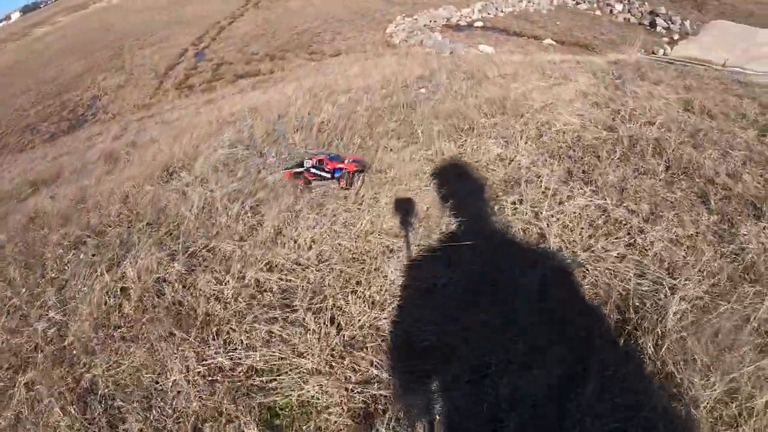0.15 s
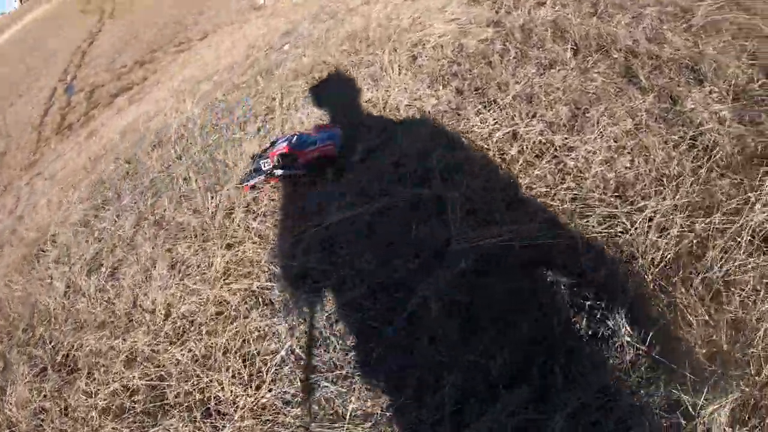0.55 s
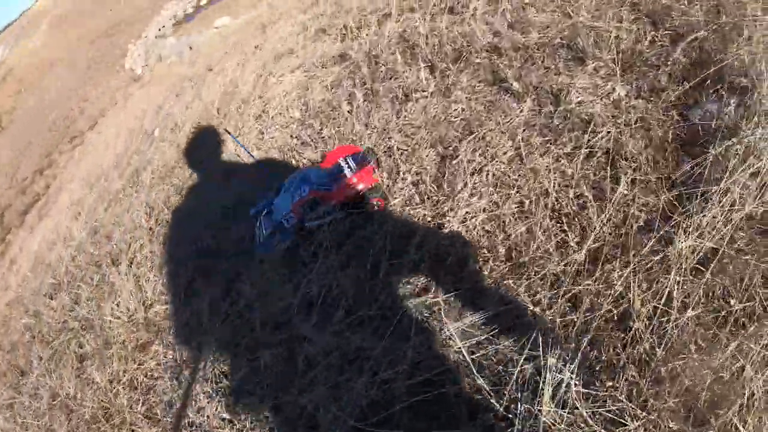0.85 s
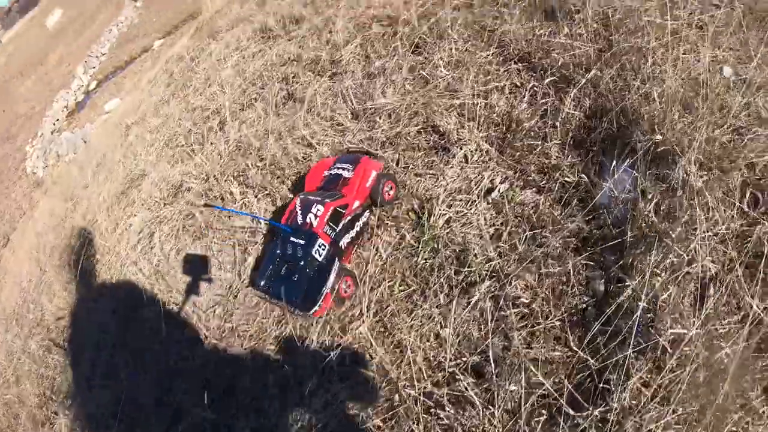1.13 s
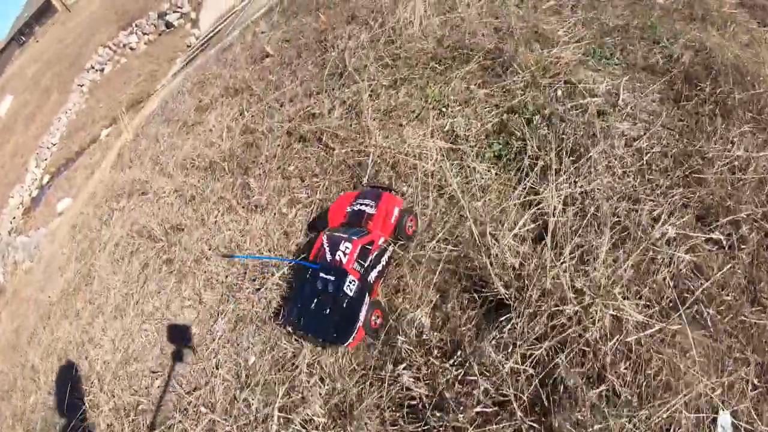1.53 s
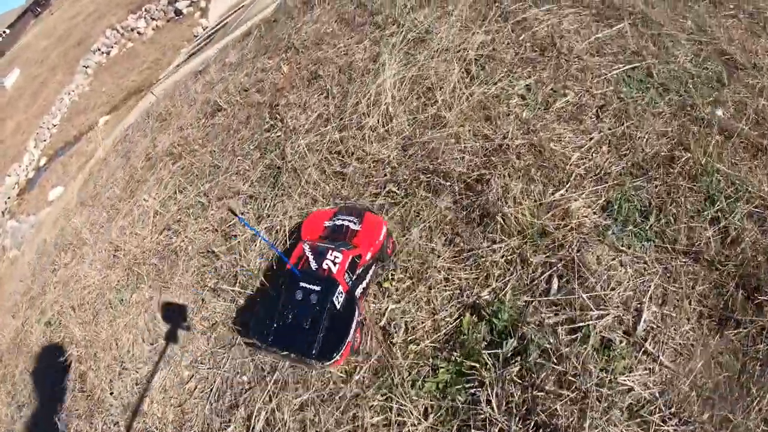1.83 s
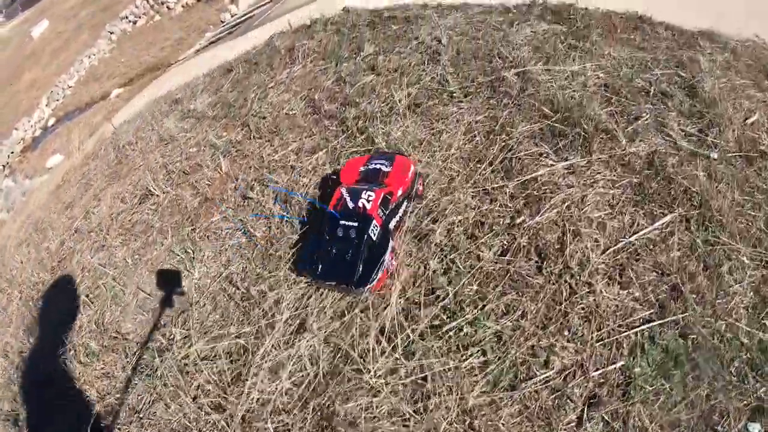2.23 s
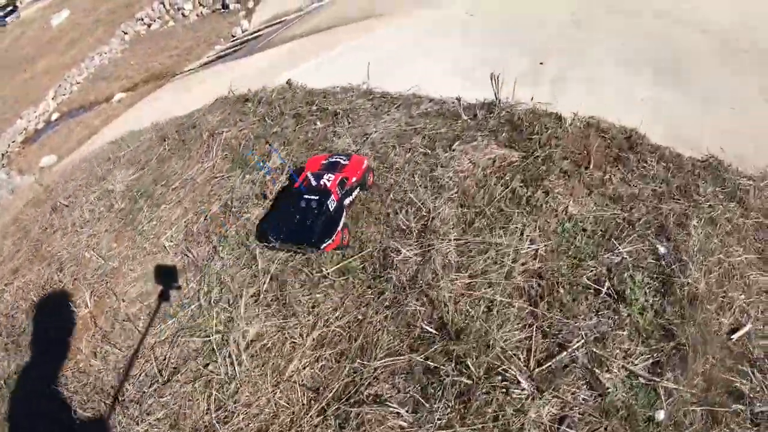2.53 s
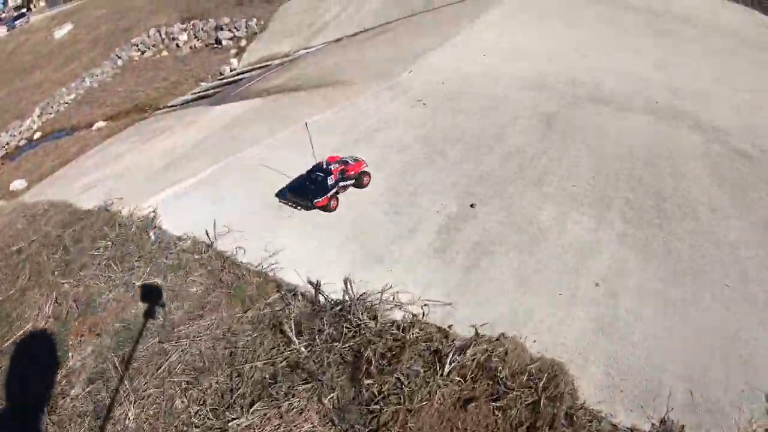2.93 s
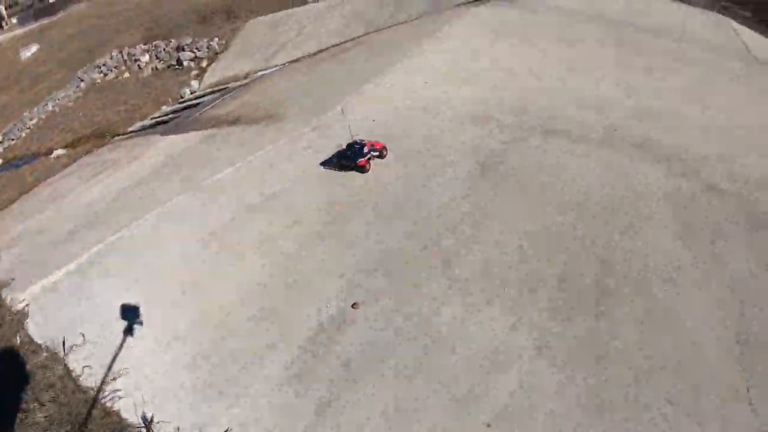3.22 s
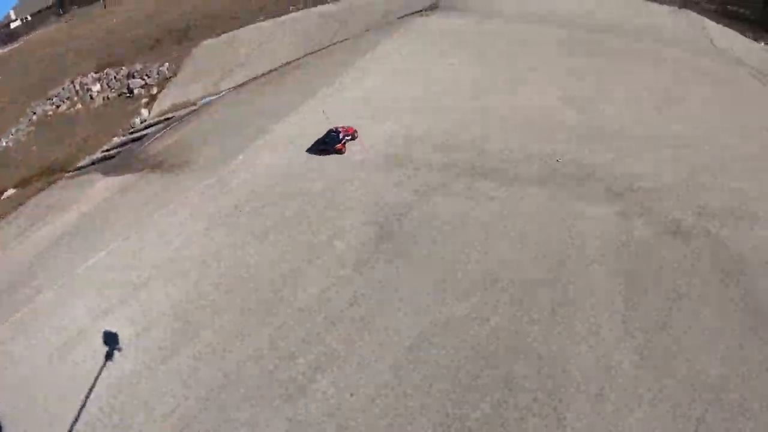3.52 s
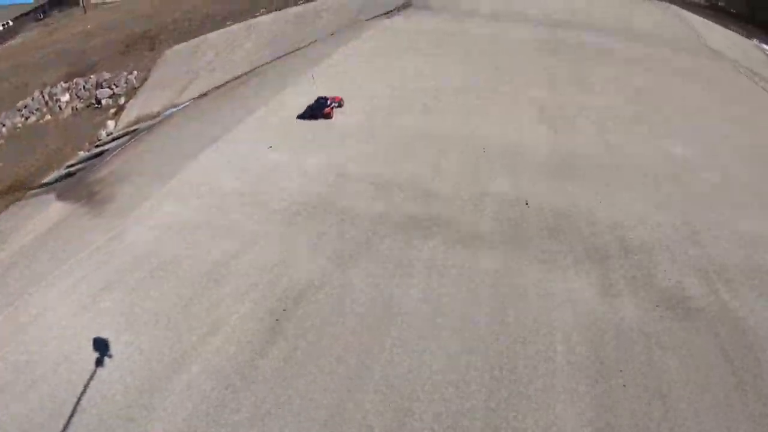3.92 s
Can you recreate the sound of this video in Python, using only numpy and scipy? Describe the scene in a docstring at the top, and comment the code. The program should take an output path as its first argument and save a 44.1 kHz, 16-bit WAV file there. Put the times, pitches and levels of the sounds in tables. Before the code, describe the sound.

A small electric model truck rustles and knocks through dry grass past the microphone, then whines away higher over bare concrete.

```python
"""Electric model truck, dry grass to concrete

A small truck ploughs towards the microphone through tall dry grass, passes close by, then runs off over concrete.
Stalks and tyre grit are random grains given a spectrum; motor and gears are unsteady tones tied to one speed curve.
Bumps are struck shell and chassis modes; wind buffets the microphone and one gust thumps its left port.
Most levels follow curves in time; bumps and thumps are single events, and the faint air wash is steady.
The stereo image closes towards the centre."""
import sys
import numpy as np
from scipy import signal
from scipy.fft import rfft, irfft, next_fast_len
from scipy.io import wavfile

SR = 44100
rng = np.random.default_rng(int(sys.argv[2]) if len(sys.argv) > 2 else 0)


def unload_audio(sound):
    """Save the sound as a 16-bit wav file, at the path given as the first command line argument."""
    columns = np.transpose(np.atleast_2d(sound))
    # keep every value between -1 and 1, then stretch to whole-number steps
    steps = np.round(np.clip(columns, -1, 1) * 32767)
    wavfile.write(sys.argv[1], SR, steps.astype(np.int16))


N = 179338
TIME = np.arange(N) / SR   # s

# Speed of the motor. Each row: time in seconds, whine in Hz.
MOTOR_SPEED = [(0, 799), (.06, 761), (.13, 856), (.27, 660), (.32, 705), (.39, 805), (.46, 822), (.52, 869),
               (.57, 1104), (.63, 1118), (.68, 1175), (.73, 1226), (.88, 1098), (1.01, 1178), (1.07, 1027),
               (1.15, 754), (1.21, 725), (1.28, 961), (1.34, 943), (1.43, 717), (1.47, 705.6), (1.58, 620),
               (1.66, 703), (1.73, 703.6), (1.79, 828), (1.85, 840), (1.97, 599.6), (2.13, 635), (2.2, 798),
               (2.27, 856), (2.42, 752), (2.52, 793), (2.6, 993), (2.77, 1202), (2.9, 1169), (3.02, 1310),
               (3.09, 1756), (3.2, 1718), (3.33, 1654), (3.58, 1600), (3.71, 1784), (3.77, 1650),
               (3.79, 1438), (3.86, 1249), (3.94, 1210), (4.01, 1050), (4.07, 1017)]
# Passage through the grass. Each row: time in seconds, swish in dB and shell drumming in dB, both before trims.
GRASS_LEVELS = [(0, -34.5, -52), (.05, -32.5, -41), (.2, -38.5, -48.5), (.33, -34, -43), (.55, -30.5, -47),
                (.7, -28, -38.5), (.87, -28.5, -36), (1.0, -28, -40), (1.19, -29, -33), (1.29, -25, -35),
                (1.42, -28.5, -31.5), (1.59, -23.5, -31), (1.67, -28, -31.5), (2.08, -26, -32.5),
                (2.16, -29.5, -31.5), (2.3, -24.5, -30.5), (2.42, -28.5, -32.5), (2.6, -24, -31),
                (2.76, -25, -38), (3.05, -26, -34)]
# The throttle is eased or blipped. Each row: time in seconds, half length in seconds,
# then the change of the pinion, of the idler, of the spur gear and of the motor, all in dB.
THROTTLE_MOVES = [(.04, 0.027, 3, 3, -2, 2), (.22, 0.05, -14, -7, 5.5, -1), (.345, 0.021, 4.5, -1, 4, 4),
                  (.46, 0.032, 1.5, -3, -8, -1), (.53, .02, 0, 2, -9, -15), (.68, 0.044, 6, 7, 2, 4),
                  (.86, .05, -2, 4, -8, -17), (.955, 0.012, 21.5, -2, -10, -25),
                  (1.03, 0.032, 12.5, 10, 6.5, 0), (1.08, .012, -6, -4, -6, 7),
                  (1.215, 0.012, 6, 0, -11, 10), (1.295, 0.053, 7, 3.5, 9.5, -0.5),
                  (1.44, 0.021, 8.5, -8, -4, -7), (1.8, .025, 9.5, 8, 0, -8), (1.87, .012, 10, 0, 3, 0),
                  (1.93, .03, -3, 0, -8, -3), (2.14, 0.014, -18, 1, 0, -4), (2.28, .05, -1, 5, 3, 2),
                  (2.47, 0.063, -3.5, 0, -5, -16), (2.6, 0.042, 0, 7, 9.5, 3), (2.72, 0.05, -9, 3, 15, -3),
                  (2.81, .025, 5, 5, -1, 3), (2.95, 0.062, 10, 1, -4, 3.5), (3.33, .08, 2, 0, -2, 5.5),
                  (3.52, 0.013, 9.5, 0, 0, 6), (3.63, 0.034, 2, 0, 6, -12), (3.735, 0.027, 8, 0, 6, 7),
                  (3.84, 0.058, 12.5, 0, -2, 8.5), (3.965, .03, 7, 11, 0, -8)]
# The gear tones start rough, are cleanest near .7 s, then roughen through the grass and onto the concrete.
# Each row: time in seconds, roughness from 0 to 1.
BACKLASH_ROUGHNESS = [(0, .65), (.45, .35), (.72, .14), (1.05, .3), (1.25, .55), (1.9, .6), (2.4, .8),
                      (2.7, .6), (2.85, .8), (3.1, .8), (4.07, .55)]

GRASS_ENDS_S = 3.06
FULL_POWER_HZ = 1200   # whine at which the motor reaches its full power


def from_db(db):
    """Decibels to gain."""
    return 10 ** (np.asarray(db) / 20)


def rms_one(x):
    """Scale to unit rms."""
    return x / np.sqrt(np.mean(x ** 2) + 1e-20)


def in_time(rows):
    """Each column of a curve, sample by sample."""
    s, *columns = np.transpose(rows)
    return [np.interp(TIME, s, column) for column in columns]


def swells(rows, half_s=None):
    """Bell-shaped changes of level, summed for each column; their half length is shared or follows the time."""
    s, *columns = np.transpose(rows)
    if half_s is None:
        half_s, columns = columns[0][:, None], columns[1:]
    bells = np.exp(-.5 * ((TIME - s[:, None]) / half_s) ** 2)
    return np.array(columns) @ bells


def drift(rate):
    """Smooth random wandering, mostly slower than this rate in Hz; spread about 1."""
    step = 20   # samples between the drawn points
    pole = np.exp(-2 * np.pi * rate * step / SR)
    noise = rng.standard_normal(N // step + 2002)
    slow = signal.lfilter([1], [1, -2 * pole, pole * pole], noise)[2000:]   # let it settle first
    return np.interp(np.arange(N) / step, np.arange(len(slow)), rms_one(slow))


def colour(x, spectrum):
    """Filter a signal by a spectrum that falls away beyond its ends; rms 1."""
    size = next_fast_len(N)
    hz = np.maximum(np.fft.rfftfreq(size, 1 / SR), 1)
    points, db = np.transpose(spectrum)
    ends = np.minimum(hz / points[0], 1) ** 2 * np.minimum(points[-1] / hz, 1) ** 2
    gain = ends * from_db(np.interp(np.log(hz), np.log(points), db))
    return rms_one(irfft(rfft(x, size) * gain, size)[..., :N])


def ring(clicks, hz, t60):
    """A unit click sets a sine of height 1 ringing; it falls by 60 dB in t60 seconds."""
    r, w = from_db(-60 / (t60 * SR)), 2 * np.pi * hz / SR
    return signal.lfilter([0, np.sin(w)], [1, -2 * r * np.cos(w), r * r], clicks + 1e-18)


def grains(per_s, spread_db):
    """Tiny contacts at random moments, of random sign and spread in strength; rms 1."""
    strength_db = spread_db * np.minimum(rng.exponential(1, N), 4)
    sizes = from_db(strength_db) * rng.choice([-1, 1], N)
    return rms_one(sizes * (rng.random(N) < per_s / SR))


def widen(mid, side_db):
    """Sound scattered around the source differs between the channels: noise is added to one, taken from the other."""
    return mid + from_db(side_db) * rng.standard_normal(N) * np.array([[1], [-1]])


def distance_db():
    """Sound weakens in proportion to distance; 0 dB at 1 m."""
    # The truck comes up to the microphone, then runs off. Each row: time in seconds, distance in metres.
    path = [(0, 2.9), (.65, 0.87), (1.2, 1.03), (2.5, 1.6), (3.1, 1.36), (3.5, 2.17), (3.85, 3.23),
            (4.07, 5.3)]
    return -20 * np.log10(in_time(path)[0])


def on_concrete(crossing_s=0.0047):
    """Share of the truck's weight that has left the grass."""
    return .5 + .5 * np.tanh((TIME - GRASS_ENDS_S) / crossing_s)


def hops_db():
    """The level dips while the wheels are off the ground."""
    # The truck hops clear of the ground. Each row: time in seconds, change of level in dB.
    hop_rows = [(.09, -6.5), (.798, -5.5), (.84, -9), (1.127, -7), (1.174, -12), (1.38, -0.5),
                (1.411, -3.5), (1.49, -2), (1.65, -3.5), (1.692, -5.5), (1.707, -5.5), (1.843, -7),
                (1.9, -2), (2.13, -4.5), (2.17, -2.5), (2.38, -6), (3.09, -4), (3.68, -5)]
    return swells(hop_rows, half_s=0.0038)[0]


def patchy(x, depth_db, rate, count):
    """Each stalk has its own pitch: neighbouring bands swell and fade on their own; rms 1."""
    size = next_fast_len(N)
    spectrum, hz = rfft(x, size), np.fft.rfftfreq(size, 1 / SR)
    centres = np.geomspace(900, 6500, count)
    total = 0
    for tent in np.eye(count):   # overlapping triangular bands
        band = irfft(spectrum * np.interp(hz, centres, tent), size)[..., :N]
        total = total + band * from_db(depth_db * drift(rate))
    return rms_one(total)


def stalks(per_s, t60, soft_hz=4800, count=24):
    """Single stiff stalks flick free and ring briefly, each at its own pitch; rms 1."""
    pitches = np.geomspace(2350, 4500, count) * (1 + .015 * rng.standard_normal(count))
    rings = sum(ring(grains(per_s / count, spread_db=-2.5), hz, t60) for hz in pitches)
    return rms_one(signal.sosfilt(signal.butter(6, soft_hz, fs=SR, output="sos"), rings))


def grass():
    """Stalks brush the shell in clumps, flick, drum on it, sizzle and snap."""
    # Tufts slap the shell. Each row: time in seconds, swish gain in dB, crackle and rasp gain in dB.
    tufts = [(.82, -1, 0), (.92, 1.5, -7), (.955, -4, 0), (1.158, 10.5, -7), (1.585, 4, 5.5),
             (1.635, 7, 12.5), (1.729, 10, -5), (2.1, 5.5, -2), (2.114, 5.5, -4), (2.779, -11.5, 4),
             (2.955, 2, 12.5), (3.008, 6, -2)]
    # Treble against swish, high while the truck comes head on. Each row: time in seconds, level in dB before trims.
    brightness = [(0, -4.5), (.72, 1), (1.05, -11.5), (1.3, -14), (1.5, -19), (2.3, -26.5), (3.05, -15.5)]
    # Shapes of the four grass sounds. Each row: frequency in Hz, relative density in dB per Hz.
    swish_shape = [(500, -16), (900, -3.5), (1150, -0.5), (1400, -3.5), (1750, -2), (2050, -4), (2500, 0),
                   (3300, 0), (3950, -3.5), (4400, -4), (4900, -4), (5200, -9.5), (5600, -32), (7500, -30)]
    drum_shape = [(90, -12.5), (170, -1), (260, -1.5), (330, -8), (430, -3.5), (570, 2), (760, -2.5),
                  (950, -12.5), (1400, -24), (2500, -17.5)]
    crackle_shape = [(6300, -4), (7100, -5), (7600, -0.5), (8500, 2.5), (9200, -3), (9900, 2.5),
                     (11000, -4.5), (13000, -8.5), (15500, -24)]
    rasp_shape = [(4500, -0.5), (5150, 6.5), (5600, 0), (6600, 0.5), (6950, -2.5), (7400, -8), (8700, -17),
                  (9850, -9.5), (11000, -50)]

    (swish_db, drum_db), (bright_db,) = in_time(GRASS_LEVELS), in_time(brightness)
    tuft_db, snap_db = swells(tufts, half_s=0.0038)
    clumps_db = 1.4 * drift(45) + hops_db()

    brushing = colour(widen(grains(per_s=4500, spread_db=1.5), side_db=-48), swish_shape)
    brushing = patchy(brushing, depth_db=3.0, rate=13.8, count=22)
    flicks = from_db(-4.5) * stalks(per_s=260, t60=.03)
    swish = (brushing + flicks) * from_db(swish_db - 2 + tuft_db + 0.21 * drift(43))

    drum = colour(widen(grains(per_s=1100, spread_db=1.5), side_db=-36), drum_shape)
    drum = drum * from_db(drum_db - 1 + 1.0 * drift(18))

    crackle = colour(widen(grains(per_s=9000, spread_db=2.0), side_db=-4), crackle_shape)
    crackle = crackle * from_db(swish_db - 13 + 0.42 * bright_db + snap_db)   # follows brightness in part

    rasp = colour(widen(grains(per_s=12000, spread_db=5.0), side_db=-14.0), rasp_shape)
    rasp = rasp * from_db(swish_db + 2 + bright_db + snap_db + 1.6 * drift(76))
    return (swish + drum + crackle + rasp) * from_db(clumps_db)


def shaft_phase():
    """The turning of the motor in radians: dragging stalks shake its speed, on concrete it runs more evenly."""
    shake = .003 + .009 * in_time(BACKLASH_ROUGHNESS)[0] * (1 - on_concrete())
    hz = in_time(MOTOR_SPEED)[0] * (1 + shake * drift(70))
    return 2 * np.pi * np.cumsum(hz) / SR


def smeared(phase, rough, flutter_hz=45, rattle_hz=190):
    """Backlash breaks a tone into a fluttering core and a wide rattle, which takes the power share rough."""
    core = rms_one(np.real((2 + drift(flutter_hz) + 1j * drift(flutter_hz)) * np.exp(1j * phase)))
    rattle = rms_one(np.real((drift(rattle_hz) + 1j * drift(rattle_hz)) * np.exp(1j * phase)))
    return np.sqrt(1 - rough) * core + np.sqrt(rough) * rattle


def motor():
    """A wavering whine, louder with speed; at top speed its gritty octave meets a housing resonance and sings out."""
    (hz,), throttle_db = in_time(MOTOR_SPEED), swells(THROTTLE_MOVES)[-1]
    power_db = 8 * np.minimum(np.log2(hz / FULL_POWER_HZ), 0)   # 8 dB per octave
    unloaded_db = -5.5 * on_concrete()
    db = -38.5 + power_db + unloaded_db + throttle_db + distance_db() + hops_db()

    phase = shaft_phase()
    octave = smeared(2 * phase, rough=.72, rattle_hz=320) * from_db(2.0 * drift(90))
    housing = signal.iirpeak(3400, 6.6, fs=SR)   # Hz, Q
    octave = signal.lfilter(*housing, signal.lfilter(*housing, octave))
    whine = smeared(phase, rough=.1, rattle_hz=110)
    return (whine + from_db(12) * octave) * from_db(db)


def gear(tones):
    """The tones of one gear, coloured by the housing; they break up as the teeth lose and regain contact."""
    # Response of the gear housing. Each row: frequency in Hz, relative gain in dB.
    housing = [(1500, -8), (2100, -2), (2450, -1.5), (2700, -2.5), (3000, 3.5), (3500, 1.5), (3900, 4),
               (4300, -2.5), (4800, 5), (5300, -8.5), (6500, 7), (7200, 1)]
    (rough,), phase = in_time(BACKLASH_ROUGHNESS), shaft_phase()
    breaks_db = 3.2 * rough * drift(45)
    total = 0
    for multiple, db, unloaded_db in tones:
        tone = colour(smeared(multiple * phase, rough), housing)
        total = total + from_db(db + unloaded_db * on_concrete()) * tone
    return from_db(breaks_db) * total


def gears(shell_hz=5000):
    """Meshing teeth sing with the motor and chatter; once the truck has passed, its shell shades the treble."""
    # Tones of the gear train. Each row: multiple of the whine, level in dB at 1 m and full-power speed
    # before throttle, drag and hops, change on concrete in dB.
    pinion_tones = [(4.75, -31.5, -14), (5.12, -40, -14), (5.5, -43, -14)]
    idler_tones = [(3.23, -38.5, -1)]
    spur_tones = [(2.32, -37.5, -9)]
    # Shape of the tooth chatter. Each row: frequency in Hz, relative density in dB per Hz.
    chatter_shape = [(2300, -7), (2800, -2.5), (3050, 1), (3550, 1), (3850, 3.5), (4250, 1), (4800, 2),
                     (5200, -12), (6000, -12)]
    passes_s = .88   # from here on the truck is heard from behind

    (hz,), (swish_db, _) = in_time(MOTOR_SPEED), in_time(GRASS_LEVELS)
    pinion_db, idler_db, spur_db, _ = swells(THROTTLE_MOVES)
    # in the grass the gears labour with its drag, taken from the swish as if at 1 m
    drag_db = swish_db - distance_db()
    drag_db = (1 - on_concrete()) * 0.37 * (drag_db - np.median(drag_db))

    tones = from_db(pinion_db) * gear(pinion_tones) + from_db(idler_db) * gear(idler_tones)
    tones = tones + from_db(spur_db) * gear(spur_tones)
    speed_db = 2 * np.log2(hz / FULL_POWER_HZ)   # 2 dB per octave
    chatter_db = -34 - 2 * on_concrete() + 0.57 * pinion_db + 3.9 * drift(45)
    chatter = colour(grains(per_s=5000, spread_db=1.0), chatter_shape) * from_db(chatter_db)
    whirr = tones * from_db(speed_db) + chatter
    whirr = whirr * from_db(drag_db + hops_db() + distance_db())
    shaded = signal.sosfilt(signal.ellip(7, 1, 50, shell_hz, fs=SR, output="sos"), whirr)
    return np.where(TIME < passes_s, whirr, shaded)


def wind():
    """Lumpy eddies press on the microphone, different at each port."""
    # Wind on the microphone. Each row: time in seconds, level in dB before a trim.
    wind_levels = [(0, -32), (.45, -30), (.85, -31), (1.5, -34.5), (2.1, -34.5), (3.0, -33), (3.35, -30),
                   (4.07, -30.5)]
    # Shape of the buffeting. Each row: frequency in Hz, relative density in dB per Hz.
    buffet_shape = [(22, 1), (45, 1), (85, 0), (130, -2.5), (175, -5.5), (240, -19.5), (330, -21.5),
                    (600, -27.5)]
    (db,) = in_time(wind_levels)
    eddies = colour(widen(rng.standard_normal(N), side_db=-12.5), buffet_shape)
    return eddies * from_db(db + 0.2 * drift(6.3) - 2.5)


def open_air():
    """A steady faint wash of filtered noise, wide across the channels."""
    # Shape of the open air. Each row: frequency in Hz, relative density in dB per Hz.
    air_shape = [(100, -39), (600, 0), (3000, -8), (6000, -27), (15000, -40)]
    return from_db(-52.5) * colour(widen(rng.standard_normal(N), side_db=3.0), air_shape)


def strike(times, levels_db, favoured_hz, modes, rebound_s, focus_db=14):
    """A blow is a quick chatter of fading contacts; where it lands decides which modes it favours."""
    out = np.zeros(N)
    gaps = np.array([[0], [rebound_s], [rebound_s]]) * rng.uniform(.5, 1.5, (len(times), 3)).T
    contacts = times + np.cumsum(gaps, axis=0)
    for k, (hz, db, t60) in enumerate(modes):
        clicks = np.zeros(N)
        mode_db = levels_db + db - focus_db * np.abs(np.log2(hz / favoured_hz))   # focus in dB per octave
        for when, fade_db in zip(contacts, (0, -2, -6)):
            at = np.clip((when * SR).astype(int), 0, N - 1)
            clicks[at] += from_db(mode_db + fade_db + rng.normal(0, 2.5, len(times)))
        out += (-1) ** k * ring(clicks, hz, t60)
    return out


def bumps(contact_hz=5000, clack_hz=3600):
    """The chassis bottoms out: the shell thuds and the suspension clacks, dulled by soft plastic."""
    # Chassis bumps. Each row: time in seconds, thud in dB and clack in dB, both before trims and mode levels,
    # pitch that the thud favours in Hz.
    bump_rows = [(.039, -23.5, -44, 750), (0.926, -20, -25, 700), (1.153, -10, -9, 770),
                 (1.167, -12, -30, 730), (1.203, -18, -23, 616), (1.344, -15, -27, 695),
                 (1.378, -15, -32, 650), (1.421, -8.5, -23, 761), (1.432, -17, -31, 500),
                 (1.469, -11.5, -22, 915), (1.503, -14, -13.5, 950), (1.581, -12.5, -15, 560),
                 (1.728, -18, -24, 800), (1.929, -23, -33, 424), (1.941, -9.5, -30, 414),
                 (1.969, -11, -20, 945), (2.052, -16.5, -24, 560), (2.087, -14.5, -26, 579),
                 (2.099, -11.5, -26, 445), (2.126, -16, -41, 327), (2.273, -20.5, -14, 605),
                 (2.468, -24, -31, 598), (2.579, -17, -24, 740), (2.594, -18, -28, 683),
                 (2.637, -14.5, -16, 949), (2.668, -12, -28, 990), (2.862, -15.5, -26, 1102),
                 (3.994, -28.5, -45, 394)]
    # Modes of the plastic shell, then of the suspension. Each row: frequency in Hz, level in dB, t60 in seconds.
    shell_modes = [(260, -8, 0.087), (320, -5.5, 0.016), (399, -4, 0.045), (572, -4.5, 0.039),
                   (660, -12.5, 0.027), (725, -3, 0.051), (976, 2.5, 0.0098), (1090, 2, 0.016),
                   (1610, -3.5, 0.016)]
    clack_modes = [(2160, -3, 0.031), (2880, -6, 0.008), (3260, -5, 0.0081), (4140, 5.5, 0.0032)]
    s, thud_db, clack_db, thud_hz = np.transpose(bump_rows)
    thuds = strike(s, thud_db - 4.5, thud_hz, shell_modes, rebound_s=0.004104)
    clacks = strike(s, clack_db - 0.5, clack_hz, clack_modes, rebound_s=0.0017)
    return signal.sosfilt(signal.butter(5, contact_hz, fs=SR, output="sos"), thuds + clacks)


def thumps(soft_hz=330, cycles=3.2):
    """Each eddy of the gust is a push of air that swings back and dies away within a few cycles."""
    # Thumps on the left port. Each row: time in seconds, height in dB before decay and softening, pitch in Hz.
    thump_rows = [(0.645, -9.5, 109), (.668, -10, 110), (.682, -10, 65), (0.724, -5, 91),
                  (.759, -4.5, 109.9), (.795, -13, 60.4), (.829, -5, 150), (0.838, -10, 91),
                  (.855, -7, 150), (0.874, -9, 100), (.915, -17, 170.5)]
    at = np.arange(N)
    pushes = sum(ring(from_db(db) * (at == int(s * SR)), hz, cycles / hz) for s, db, hz in thump_rows)
    return signal.sosfilt(signal.butter(3, soft_hz, fs=SR, output="sos"), pushes)


def gust():
    """One gust hits the left port alone: it rises, thumps and dies."""
    # Shape of the gust. Each row: frequency in Hz, relative density in dB per Hz.
    gust_shape = [(25, -11), (60, 0.5), (120, 0.5), (200, -1.5), (290, -2.5), (400, -20), (800, -20.5)]
    start_s, end_s = 0.648, 0.885
    rise_db = 300 * np.maximum(start_s - TIME, 0)   # 300 dB per second
    fall_db = 133 * np.maximum(TIME - end_s, 0)     # 133 dB per second
    rush = colour(rng.standard_normal(N), gust_shape) * from_db(-24 - rise_db - fall_db + 3.1 * drift(30.0))
    return (rush + thumps()) * np.array([[1], [0]])


def concrete():
    """Tread blocks patter over grit."""
    # Shape of the tyre noise. Each row: frequency in Hz, relative density in dB per Hz.
    tyre_shape = [(130, 0), (230, 5), (420, -6.5), (800, -7), (1100, -2.5), (1700, -2), (2800, -4.5),
                  (3500, 0), (4300, -14), (5200, -9), (5900, -24), (7400, -25), (8400, -21.5),
                  (10400, -27.5), (15000, -43)]
    patter = colour(widen(grains(per_s=6000, spread_db=0.0), side_db=-13.0), tyre_shape)
    uneven_db = 1.3 * drift(44)
    return patter * from_db(-28 + distance_db() + uneven_db + hops_db())


def scene():
    """The truck leaves the grass for the concrete, in open air."""
    ground = np.sqrt(1 - on_concrete()) * grass() + np.sqrt(on_concrete()) * concrete()
    return ground + motor() + gears() + wind() + open_air() + bumps() + gust()


def record(dry, airy_hz=6500, airy_share=0.22, cutoff_hz=15300):
    """The image closes nearly to mono except for a little treble; the top is cut steeply."""
    # The stereo image narrows to the centre. Each row: time in seconds, side gain in dB.
    image_width = [(0, 6), (.85, 3.5), (1.05, -1), (1.3, -15.5), (1.7, -28)]
    width = from_db(in_time(image_width)[0])
    mid, side = (dry[0] + dry[1]) / 2, (dry[0] - dry[1]) / 2
    treble = signal.sosfilt(signal.butter(2, airy_hz, "high", fs=SR, output="sos"), side)
    side = width * side + airy_share * (1 - width) * treble
    stereo = signal.windows.tukey(N, .001) * [mid + side, mid - side]   # soft ends
    return signal.sosfilt(signal.ellip(10, .2, 90, cutoff_hz, fs=SR, output="sos"), stereo)


dry = scene()
out = record(dry)
unload_audio(out)
```